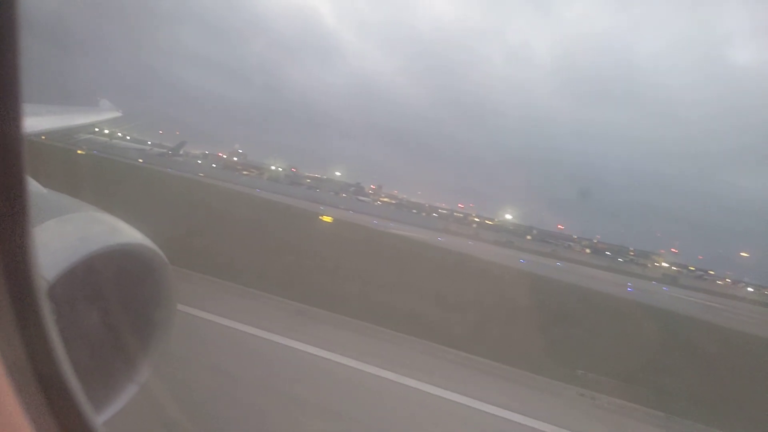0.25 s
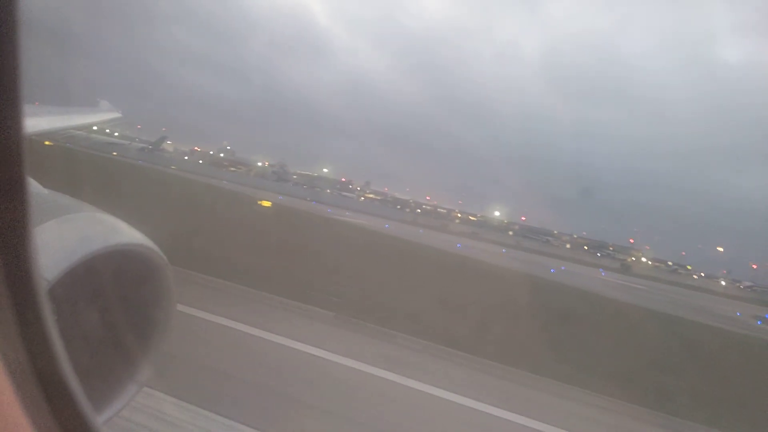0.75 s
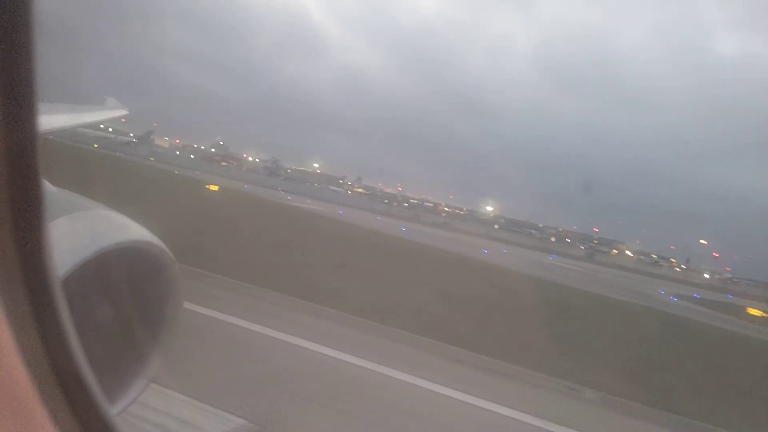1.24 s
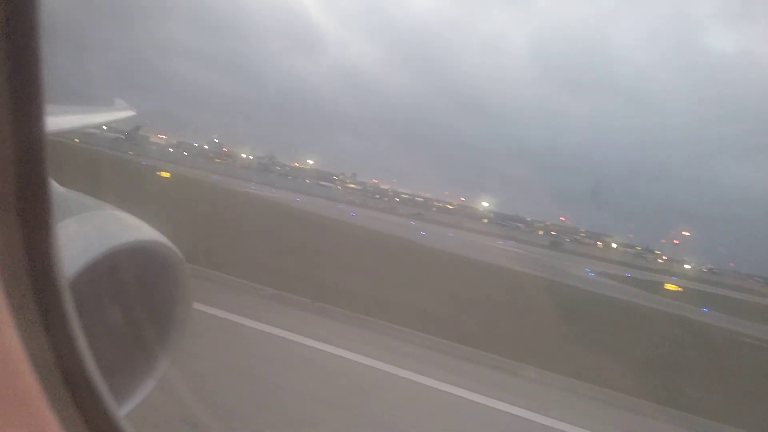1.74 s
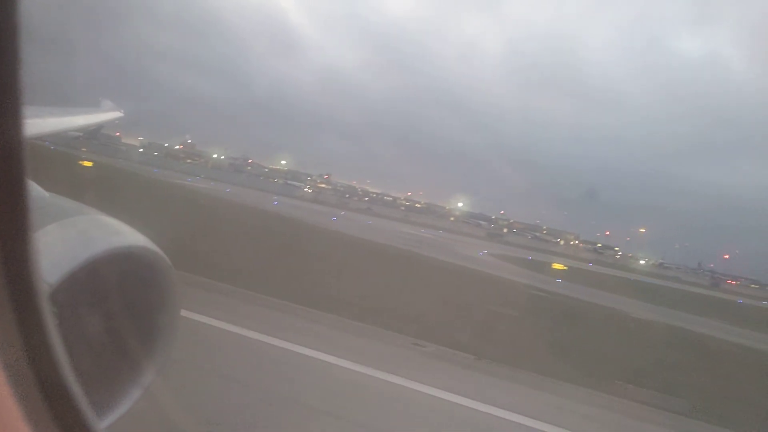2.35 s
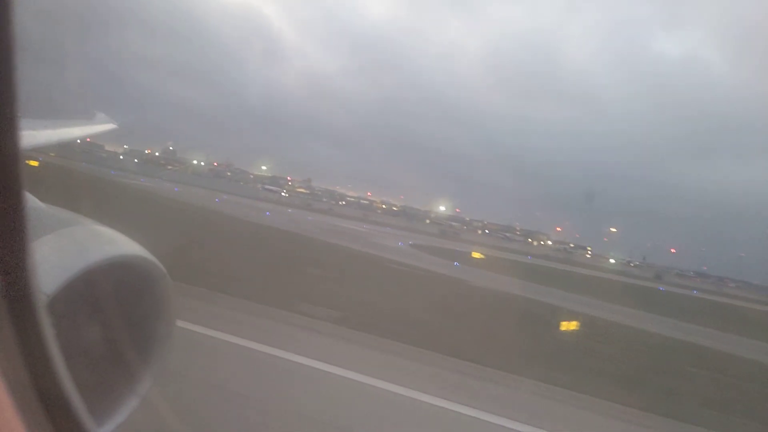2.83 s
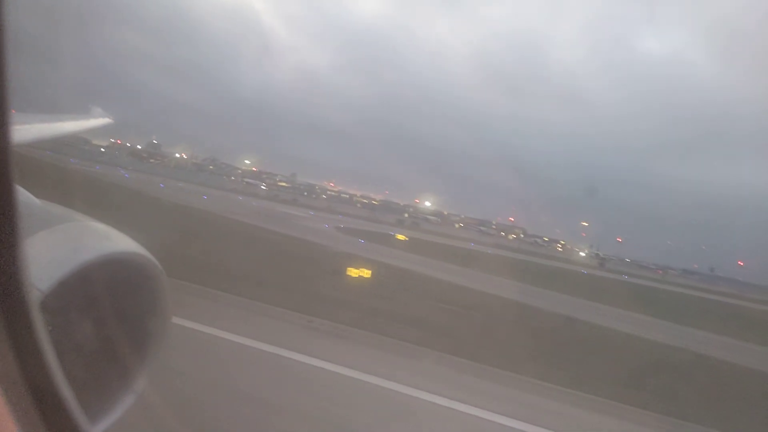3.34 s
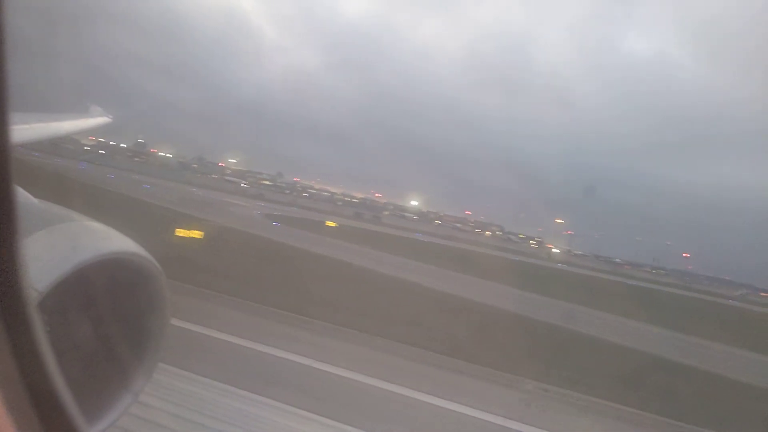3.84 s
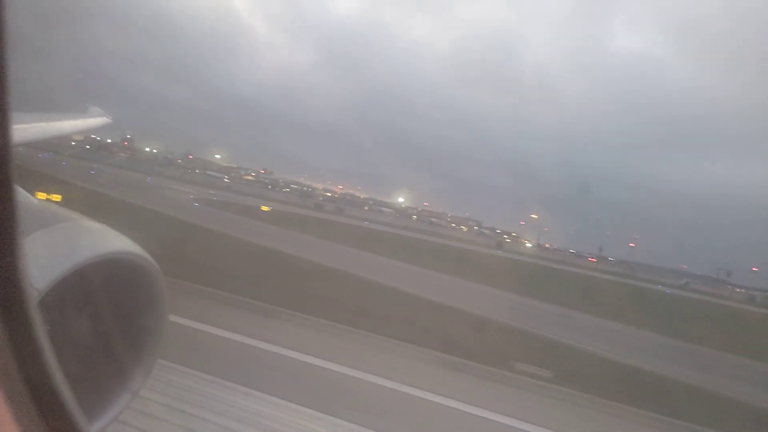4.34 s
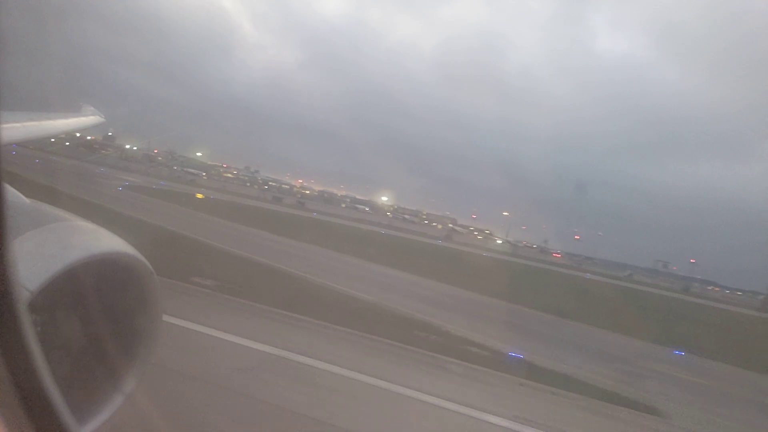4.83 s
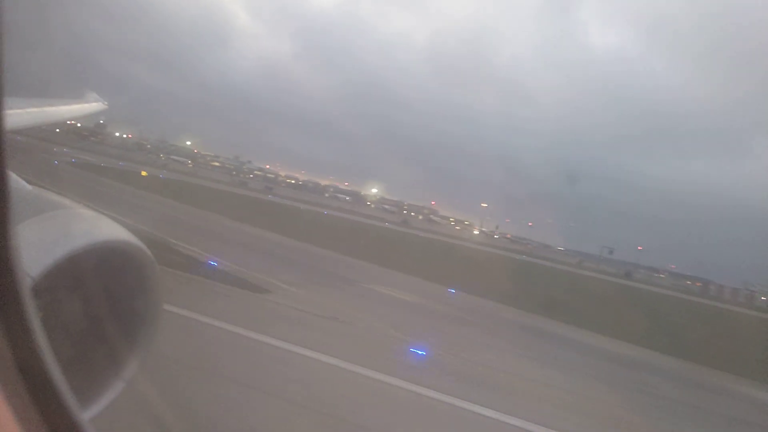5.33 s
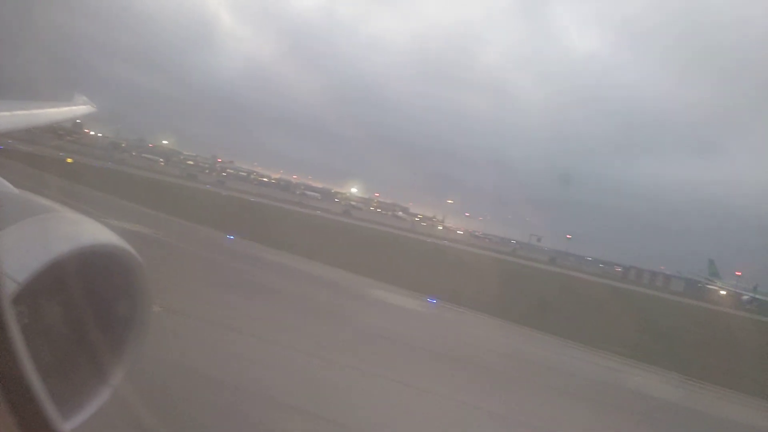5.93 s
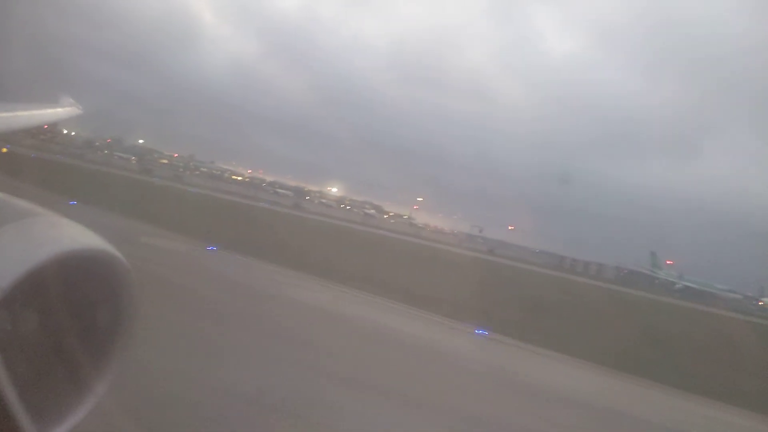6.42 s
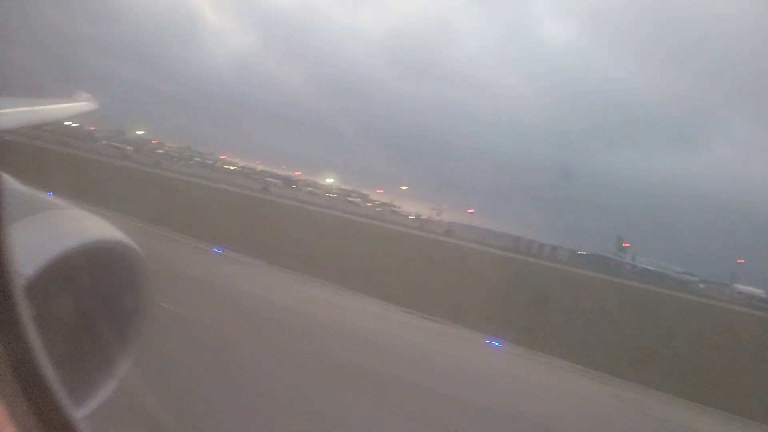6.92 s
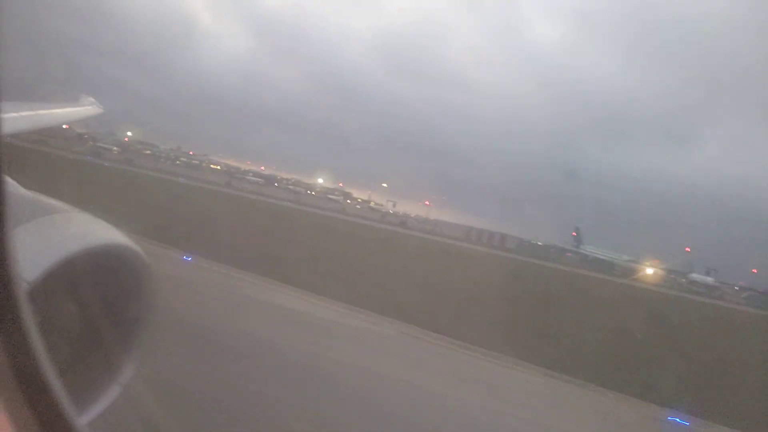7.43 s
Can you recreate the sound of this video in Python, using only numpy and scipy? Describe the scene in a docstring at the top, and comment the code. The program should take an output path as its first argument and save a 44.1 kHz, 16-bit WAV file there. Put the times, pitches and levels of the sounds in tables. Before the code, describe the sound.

Inside an airliner cabin on the takeoff roll, a steady strong engine whine sings over deep, uneven wheel rumble, roar and faint ticking trim.

```python
"""Airliner cabin on the takeoff roll

A window seat just behind the wing's engine, modelled as tones and shaped noise reaching two ears.
Wheels and exhaust rumble and roar as band-limited noise; the engine core drones as a wandering sine.
The fan sings a strong whine: a phase-shaken sine with overtones, weaker orders and humps of noise.
Broadband air hiss and thin, wandering whistles lie around it; the trim ticks as decaying noise bursts.
"""
import sys
import numpy as np
from scipy import signal
from scipy.fft import rfft, irfft, next_fast_len
from scipy.io import wavfile
from scipy.ndimage import uniform_filter1d, minimum_filter1d

SR = 44100
rng = np.random.default_rng(int(sys.argv[2]) if len(sys.argv) > 2 else 0)


def store_wav(level_fs):
    """Save 16-bit WAV to argv[1]."""
    pcm = np.round(np.clip(np.atleast_2d(level_fs), -1, 1) * 32767)
    wavfile.write(sys.argv[1], SR, pcm.T.astype(np.int16))


N = 338230
TIME = np.arange(N) / SR


def from_db(db):
    """The decibel law: amplitude ratio for a level in dB."""
    return 10 ** (np.asarray(db) / 20)


def rms_one(x):
    """Normalization to unit mean power."""
    return x / np.sqrt(np.mean(np.abs(x) ** 2) + 1e-20)


def in_time(rows):
    """Linear interpolation of each column of a curve table, sample by sample."""
    t, *columns = np.transpose(rows)
    return [np.interp(TIME, t, column) for column in columns]


def at_hz(points, hz, **ends):
    """Interpolation of a table on a log-frequency axis."""
    f, value = np.transpose(points)
    return np.interp(np.log(hz + 1), np.log(f), value, **ends)


def pan(db):
    """Interaural level difference: left and right gains for a difference L-R in dB."""
    return from_db(np.array([[.5], [-.5]]) * db)


def drift(rate):
    """Low-pass random process: noise through two equal poles with corner `rate` in Hz; rms 1."""
    step = 40   # samples between slow values
    run_in = 2000
    pole = np.exp(-2 * step * np.pi * rate / SR)
    noise = rng.standard_normal(N // step + run_in + 2)
    slow = signal.lfilter([1], [1, -2 * pole, pole * pole], noise)[run_in:]
    return np.interp(np.arange(N) / step, np.arange(len(slow)), rms_one(slow))


def turn(hz):
    """Phase as the time integral of frequency, from a random starting angle."""
    return 2 * np.pi * (np.cumsum(hz) / SR + rng.random())


def cabin_noise(spectrum):
    """Diffuse-field noise: interaural coherence falls from bass to treble; the ears' mean has rms 1."""
    # likeness of the sound field at the two ears: f/Hz, correlation (-1 to 1)
    likeness = [(40, .993), (70, .975), (170, .955), (280, .9), (450, .68), (740, .5), (1200, -.1),
                (2000, .05), (15000, 0)]
    # unequal shading of the ears by window wall and seats: f/Hz, level difference L-R/dB
    balance = [(60, 0.8), (180, 1.4), (330, 0.5), (430, 0), (530, 11.5), (620, -12.5), (740, -3),
               (860, 0.5), (1550, -4.5), (2100, -1.5), (3200, 1), (4000, -2.5), (5000, -1), (7500, -4.5),
               (10000, -4), (13000, 0)]
    size = next_fast_len(N)
    hz = np.arange(size // 2 + 1) * SR / size
    mid, side = rfft(rng.standard_normal((2, size)))
    alike = np.clip(at_hz(likeness, hz), -1, 1)
    ears = np.sqrt(1 + alike) * mid + np.sqrt(1 - alike) * side * [[1], [-1]]
    colour = from_db(at_hz(spectrum, hz, left=-90, right=-90)) * pan(at_hz(balance, hz))
    noise = irfft(ears * colour, size)[:, :N]
    return noise / np.std(noise.mean(axis=0))


def steady(x, span_s):
    """Envelope normalization: division by the local rms evens out slow swells."""
    size = max(int(span_s * SR), 2)
    power = uniform_filter1d(uniform_filter1d(x.mean(axis=0) ** 2, size), size)
    return x / np.sqrt(power + 1e-9)


def scattered(phase, scatter, rate):
    """Scattering by turbulent air: a steady tone plus a fluttering part that differs by ear; rms 1."""
    along = np.array([drift(rate), drift(rate)])
    across = np.array([drift(rate), drift(rate)])
    flutter = along * np.sin(phase) + across * np.cos(phase)
    return rms_one(np.sin(phase) + scatter * flutter)


def dying(slips, seconds):
    """Exponential decay: each slip starts at its strength and dies with this time constant."""
    tiny = 1e-18   # keeps the filter's tail out of denormal numbers
    return signal.lfilter([1], [1, -np.exp(-1 / (seconds * SR))], slips + tiny)


def cabin_air():
    """Broadband flow noise: air hisses along the cabin, its level fluctuating at random."""
    # spectrum of the hiss: f/Hz, relative level/dB per Hz
    hiss_spectrum = [(700, -16.5), (1050, -4), (1230, -5), (1440, -6), (1930, -8.5), (2210, -11),
                     (3500, -17), (4020, -16.5), (4600, -20.5), (6680, -21), (9580, -30.5), (11200, -32),
                     (13500, -35), (16000, -46)]
    level_db = -39.0 + 0.39 * drift(24)
    return from_db(level_db) * cabin_noise(hiss_spectrum)


def whistles():
    """Narrow-line radiation: thin tones from pumps and blowers, each wandering a little in pitch."""
    # centre pitches of the lasting whistles: f/Hz
    pitches = [1360, 2975, 5119, 8160, 8807, 10002, 10880, 11198, 13602]
    # the same whistles in order: level/dB, level difference L-R/dB, pitch wander/Hz
    lines = [(-52.5, -12, 1.64), (-61.5, -5, 1), (-68, -5, .5), (-70.5, -7, 5.8), (-73, -5, .5),
             (-79, -6, .5), (-68.5, -12, 8.2), (-81, -2, 0.87), (-74, -17, 10)]
    # one more line, heard only at first: f/Hz, level/dB, end t/s
    early_line = (11197, -67, .7)
    lasting = 0
    for hz, (db, side_db, wander_hz) in zip(pitches, lines):
        phase = turn(hz + wander_hz * drift(3.86))
        lasting = lasting + from_db(db) * pan(side_db) * scattered(phase, scatter=.25, rate=9.3)
    hz, db, stop_s = early_line
    fade = np.clip((stop_s - TIME) / .1, 0, 1)
    early = from_db(db) * fade * scattered(turn(hz + 4 * drift(4)), scatter=.25, rate=9)
    return lasting + early


def trim():
    """Stick-slip friction: panel seams crack brightly and buzz, with faint ticks and rubbing between."""
    # separate ticks: t/s, crack level/dB, buzz level/dB, buzz decay/s
    ticks = [(.346, -60, -46, .018), (.568, -55, -55, .015), (1.778, -57, -42, .006),
             (1.857, -58, -51, .012), (1.889, -54, -48, .01), (2.049, -46, -50, .008),
             (2.108, -63, -49, .022), (5.098, -58, -39, 0.02), (5.363, -56, -43, .009),
             (5.485, -70, -51, .006), (6.467, -56, -49, .009), (6.771, -56, -50, .008)]
    # spectra of crack, and of buzz and rubbing: f/Hz, relative level/dB per Hz
    crack_spectrum = [(5000, -14), (9500, 0), (13000, -1), (16000, -6)]
    buzz_spectrum = [(4000, -6), (5200, 5.5), (6800, 5.5), (9000, 1), (12000, -9), (16000, -17)]
    # a spell of light rustling: t/s, level/dB
    rustle = [(1.9, -77), (2.13, -58), (2.35, -67), (2.5, -52), (2.85, -78)]
    crack_decay_s, faint_buzz_decay_s = .007, .012
    faint_per_s, faint_crack_db, faint_buzz_db = 11, -67, -54

    faint_times = rng.random(N) < faint_per_s / SR
    faint = faint_times * from_db(2.7 * np.clip(rng.standard_normal(N), -2, 2))
    cracks = from_db(faint_crack_db) * faint
    buzz = from_db(faint_buzz_db) * dying(faint, faint_buzz_decay_s)
    for t, crack_db, buzz_db, decay_s in ticks:
        start = int(t * SR)
        cracks[start] = from_db(crack_db)
        buzz[start:] += from_db(buzz_db) * np.exp(-np.minimum(TIME[:N - start] / decay_s, 20))
    rubbing = from_db(in_time(rustle)[0] + 2.5 * drift(20))
    bright = dying(cracks, crack_decay_s) * cabin_noise(crack_spectrum)
    rough = (buzz + rubbing) * cabin_noise(buzz_spectrum)
    return (bright + rough) * pan(-1.5)


def fuselage():
    """Transmission through a heavy wall: wheel rumble and exhaust turbulence arrive as low noise."""
    # slow uneven level of the low rumble: t/s, level/dB
    rumble_level = [(0.0, -16.5), (0.42, -13), (1.8, -14.5), (1.97, -20.5), (2.27, -14.5), (2.69, -18.0),
                    (2.87, -13.5), (5.39, -14.0), (5.57, -18.0), (5.75, -13.0), (6.82, -15.5),
                    (7.06, -12.5), (7.3, -18.0), (7.66, -15)]
    # spectra of wheel rumble, fuselage boom and exhaust roar: f/Hz, relative level/dB per Hz
    rumble_spectrum = [(20, -46), (28, -35), (37, -20), (48, -6.5), (60, -8.5), (72, 0), (85, -1),
                       (102, -6), (125, -11), (170, -31.5)]
    boom_spectrum = [(105, -10), (135, 5), (158, -3.5), (182, 2), (215, -3), (250, -7), (300, -20.5)]
    roar_spectrum = [(200, -21), (255, -4.5), (292, 1), (350, -5), (380, -1), (412, -9.5), (445, -4.5),
                     (510, -8.5), (570, -12), (690, -17.5), (760, -17), (1000, -22), (1150, -33),
                     (2000, -29.5)]
    jolt_db, jolt_rate_hz = 2.5, 11.4   # random jolts in level: rms spread, corner of their drift
    rumble_db = in_time(rumble_level)[0] + jolt_db * drift(jolt_rate_hz)
    rumble = from_db(rumble_db) * steady(cabin_noise(rumble_spectrum), span_s=0.091)
    boom = from_db(-19) * steady(cabin_noise(boom_spectrum), span_s=0.25)
    # the roar's level, falling slightly throughout
    roar_db = -22.0 - 0.1735 * TIME
    roar = from_db(roar_db) * steady(cabin_noise(roar_spectrum), span_s=0.11)
    return rumble + boom + roar


def low_tone():
    """Periodic radiation with turbulent scattering: an engine tone below the whine."""
    # its fading as speed builds: t/s, level/dB
    fading = [(0, -31), (1.2, -32.5), (1.65, -35), (2.0, -49), (7.67, -50)]
    level_db, = in_time(fading)
    tone = scattered(turn(547 + .7 * drift(1)), scatter=.3, rate=3)
    return from_db(level_db) * tone * pan(4.6)


def core_drone():
    """Forced vibration by shaft unbalance: one unsteady pitch, made to flutter by turbulence."""
    # swells and fades of the drone: t/s, level/dB
    swells = [(0.0, -16.0), (0.84, -21), (0.96, -25), (1.14, -10.5), (1.26, -23), (1.62, -24), (1.74, -13),
              (2.03, -11.5), (3.05, -27), (3.23, -15.5), (4.49, -12.5), (4.73, -26.0), (4.97, -15),
              (5.27, -19), (6.76, -15.5), (6.94, -26.5), (7.42, -23.5), (7.66, -9.5)]
    core_hz, wander_hz = 118.4, 1.96
    flutter, flutter_rate_hz = 0.46, 7.3   # fluttering share, corner of its drift
    level_db, = in_time(swells)
    left_lead = np.array([[.22], [0]])   # radians
    phase = turn(core_hz + wander_hz * drift(7.9)) + left_lead
    along = flutter * drift(flutter_rate_hz)
    across = flutter * drift(flutter_rate_hz)
    tone = steady((1 + along) * np.sin(phase) + across * np.cos(phase), span_s=0.2)
    return from_db(level_db) * tone * pan(1.4)


def fan():
    """Blade-passing radiation: a tone, its overtones and orders, and noise humps from turbulence."""
    # strength of the whine: t/s, level/dB before the correction for ears out of step
    whine_curve = [(0.0, -25.5), (0.24, -27.5), (0.42, -24), (1.2, -27.0), (1.32, -30), (2.15, -26),
                   (2.45, -29.5), (2.87, -24.5), (3.83, -23.5), (4.19, -28.0), (4.55, -24.0), (5.09, -27.5),
                   (5.69, -23.5), (5.8, -24.5), (7.6, -22), (7.66, -27)]
    # octave of the whine: t/s, level/dB, level difference L-R/dB
    octave_curve = [(0, -37.5, -3), (1.05, -40, -3), (1.85, -39, -8), (2.7, -37.5, -1), (3.2, -43, -10),
                    (4.2, -49, -1), (5.1, -47, -4), (6.0, -39, -6), (6.6, -41.5, -8), (7.5, -41.5, -19)]
    # standing-wave pattern sliding past the seat: t/s, left ear's phase lead/rad
    lead_curve = [(0, 0.76), (1.1, 1.3), (2.4, 1.3), (3.2, 0.45), (6.0, 0.63), (7.67, 0.14)]
    # weaker orders: multiple of the whine's frequency, level/dB, level difference L-R/dB
    weak_orders = [(1 / 2, -39, 0), (5 / 9, -39, 1), (4 / 3, -57, 6), (5, -64, 0)]
    fan_hz, wander_hz = 664.2, .7
    slide_rad, slide_rate_hz = 0.69, 2   # wander of the octave's phase between the ears
    level_db, = in_time(whine_curve)
    octave_db, octave_side_db = in_time(octave_curve)
    lead, = in_time(lead_curve)
    halves = np.array([[.5], [-.5]])   # shares a phase difference between left and right

    phase = turn(fan_hz + wander_hz * drift(3.4))
    # turbulent air bends the path to each ear, which shakes the tone's phase
    shaken = phase + 0.23 * drift(22.0) + 0.1 * np.array([drift(7.3), drift(21)])
    direct = np.sqrt(2) * np.sin(shaken + lead * halves) * pan(-1.7)
    # ears out of step partly cancel in their mean, so each is raised
    ears_db = level_db - 10 * np.log10(np.clip(0.4 + 0.43 * np.cos(lead), .1, 1))
    whine = from_db(ears_db) * direct
    # hump spectra: (f/Hz, relative level/dB per Hz)
    hump = from_db(-32) * cabin_noise([(590, -6), (635, -4), (662, 5.0), (700, -1.5), (730, -29)])
    # the octave's half wavelength spans the head: roughly opposite phase at the two ears
    apart = (np.pi + slide_rad * drift(slide_rate_hz)) * halves
    octave_tone = scattered(2 * phase + apart, scatter=0.38, rate=21) * pan(octave_side_db)
    octave = from_db(octave_db) * octave_tone
    octave_hump = from_db(-53.5) * cabin_noise([(1200, -13), (1290, -6), (1330, 0.0), (1430, -31)])
    third_harmonic = from_db(-50.5) * scattered(3 * phase, scatter=0.9, rate=6.7) * pan(-1.1)
    orders = 0
    for multiple, db, side_db in weak_orders:
        tone = scattered(multiple * phase, scatter=0.22, rate=6.1)
        orders = orders + from_db(db) * pan(side_db) * tone
    return whine + hump + octave + octave_hump + third_harmonic + orders


def scene():
    """Superposition: the pressures of all sources add at the window seat."""
    background = cabin_air() + whistles() + trim()
    engine = low_tone() + core_drone() + fan()
    return background + fuselage() + engine


def record(dry):
    """Peak limiting and band-limiting: smooth gain holds peaks, the ends are eased, the top is cut."""
    cutoff_hz = 15750
    size = int(.02 * SR)
    allowed = np.minimum(1, .94 / (np.abs(dry).max(axis=0) + 1e-9))
    held = minimum_filter1d(allowed, size)
    gain = uniform_filter1d(uniform_filter1d(held, size // 2), size // 2)
    ends = np.minimum(1, np.minimum(TIME, TIME[::-1]) / .002)
    low_pass = signal.ellip(12, .1, 90, cutoff_hz, fs=SR, output="sos")
    return signal.sosfilt(low_pass, ends * gain * dry)


dry = scene()
out = record(dry)
store_wav(out)
```